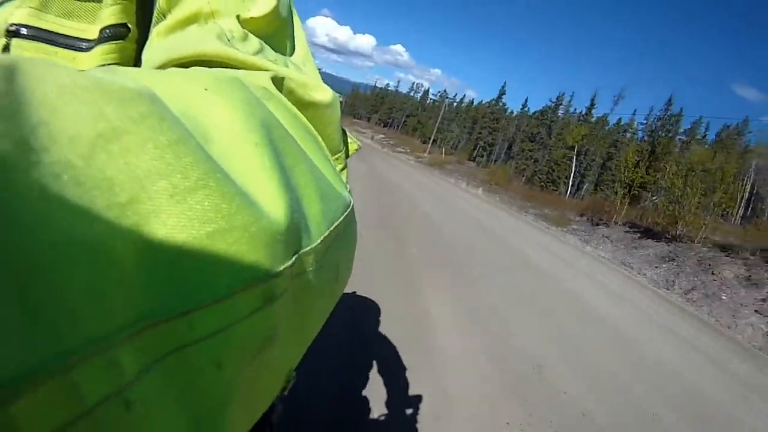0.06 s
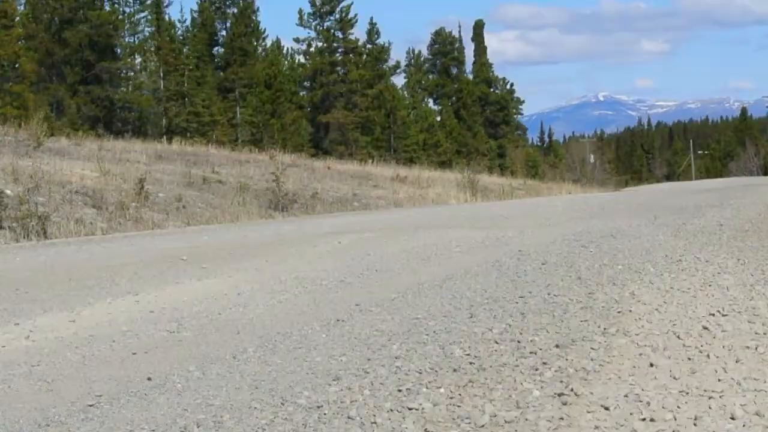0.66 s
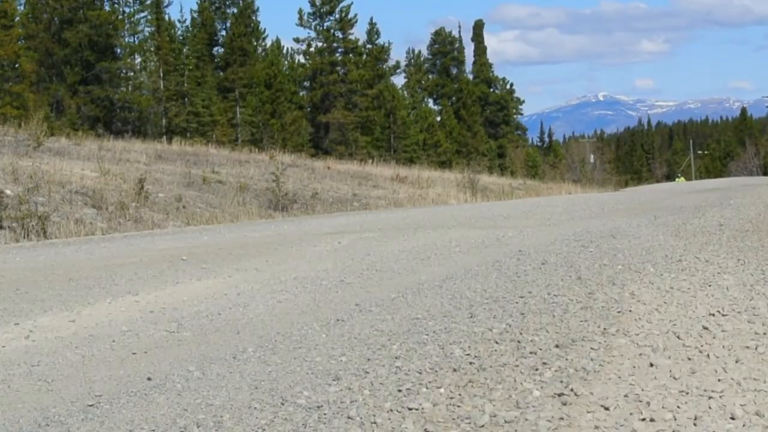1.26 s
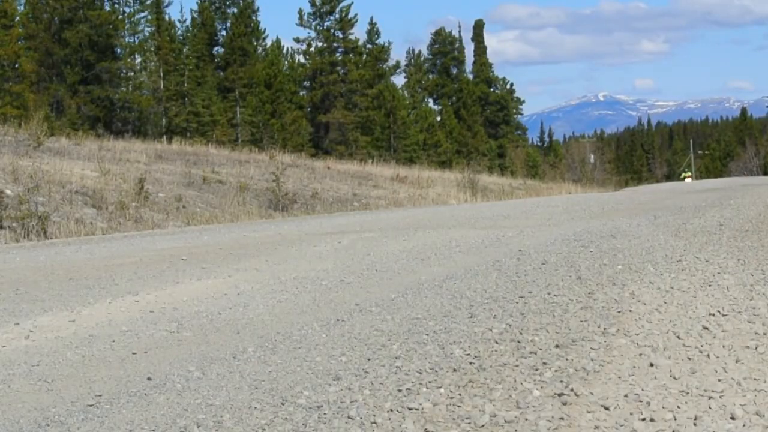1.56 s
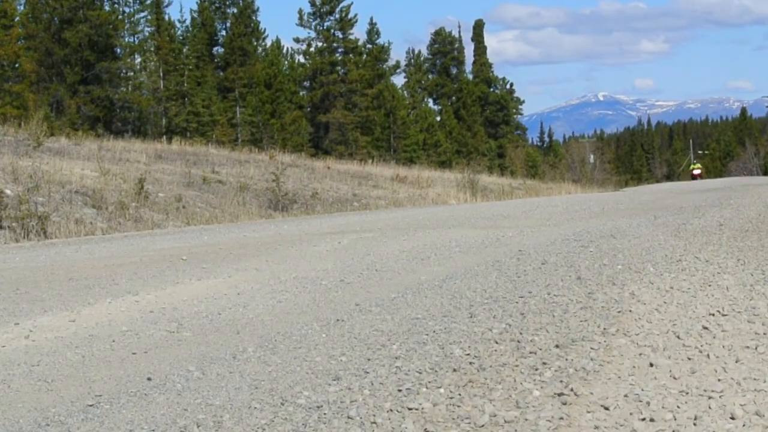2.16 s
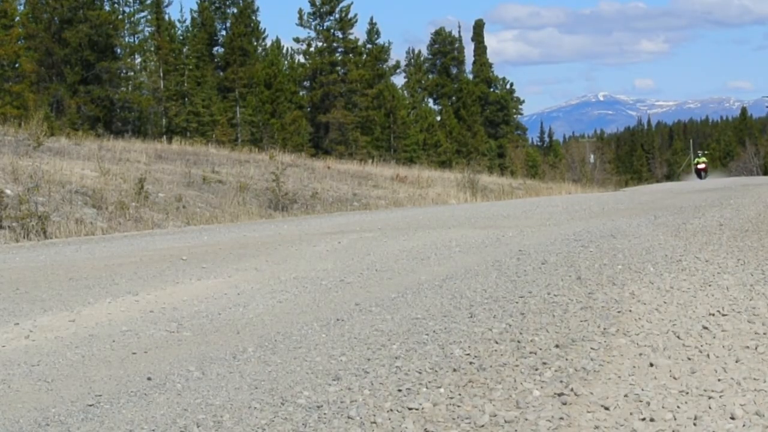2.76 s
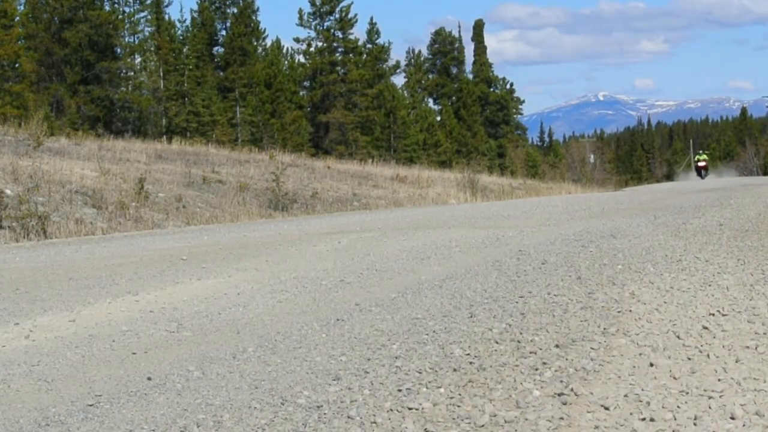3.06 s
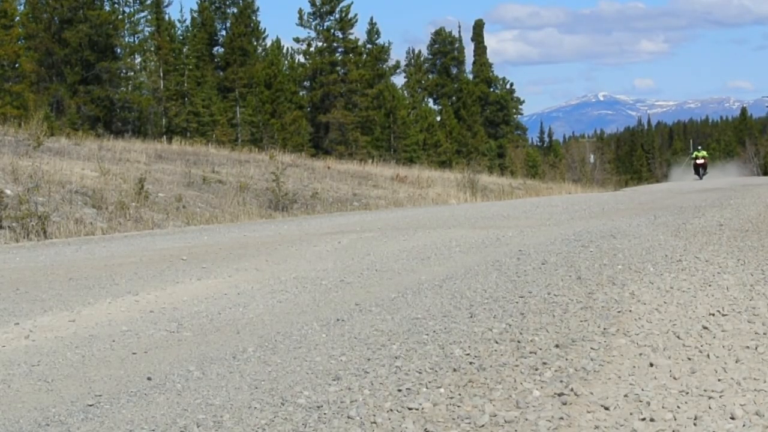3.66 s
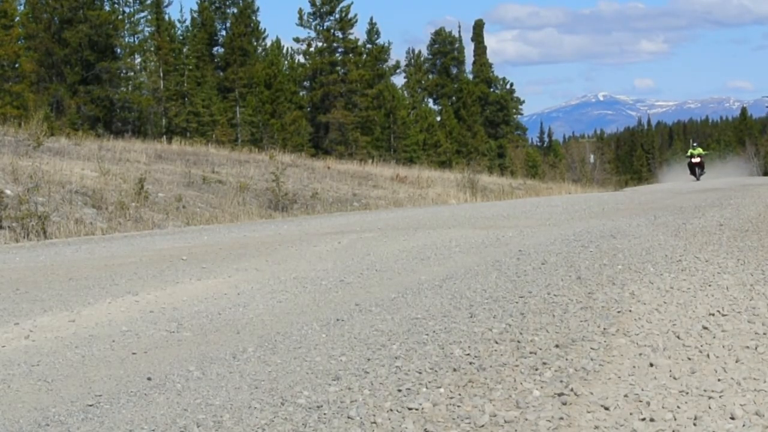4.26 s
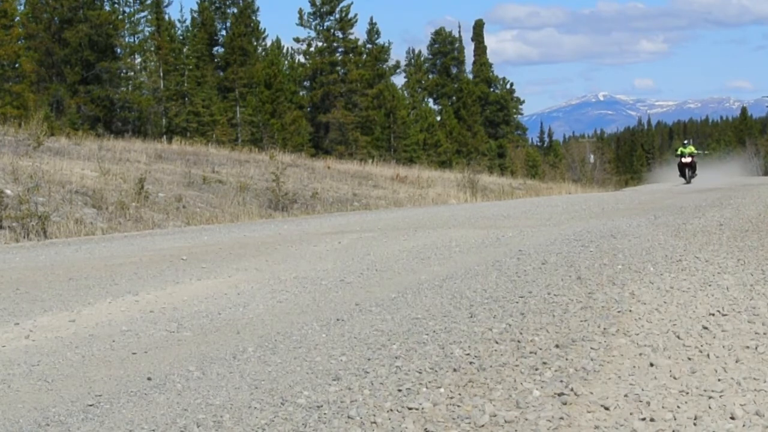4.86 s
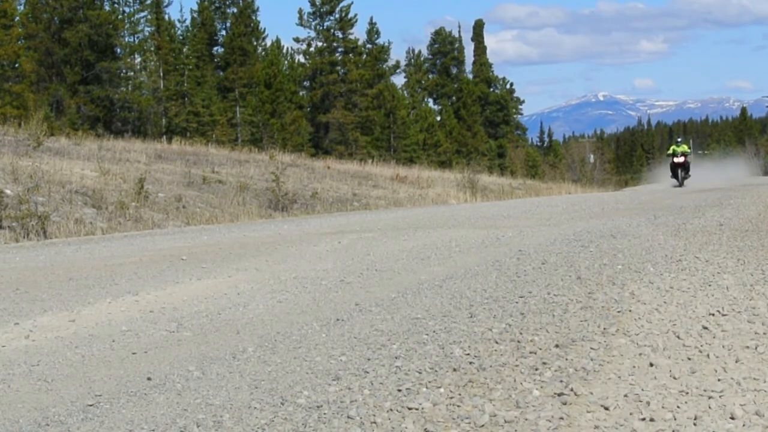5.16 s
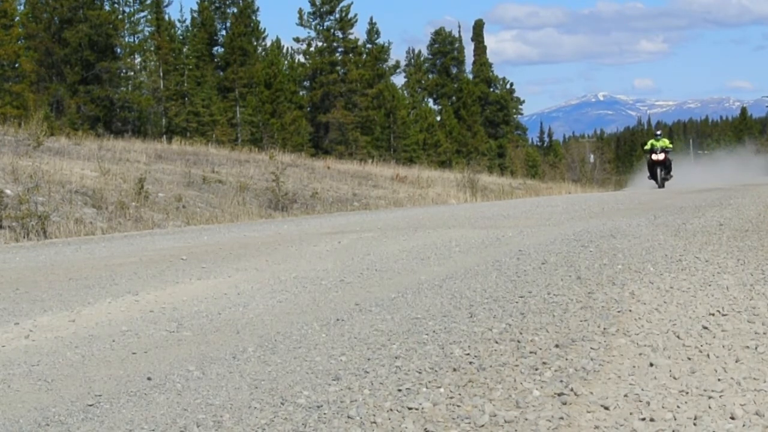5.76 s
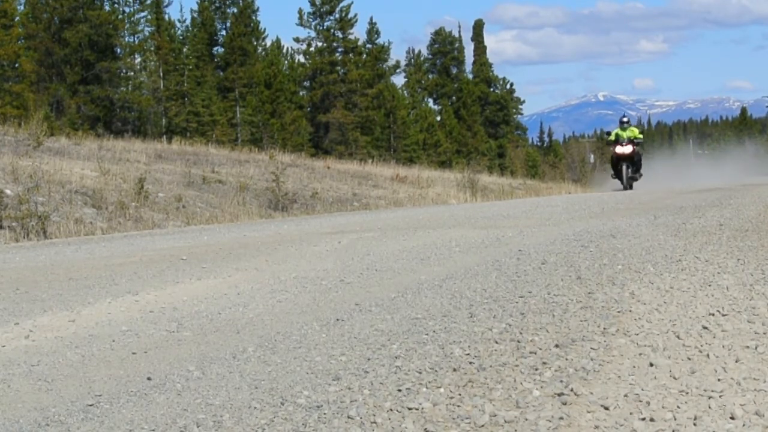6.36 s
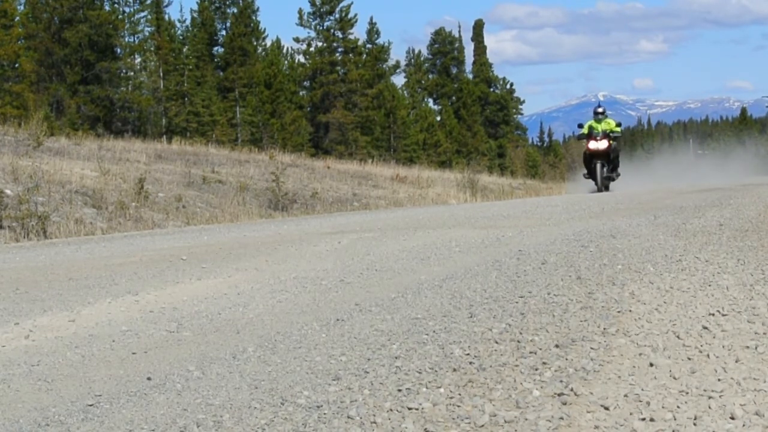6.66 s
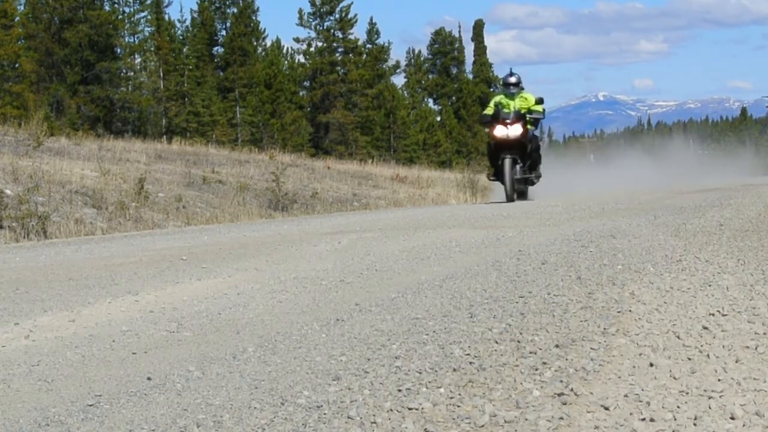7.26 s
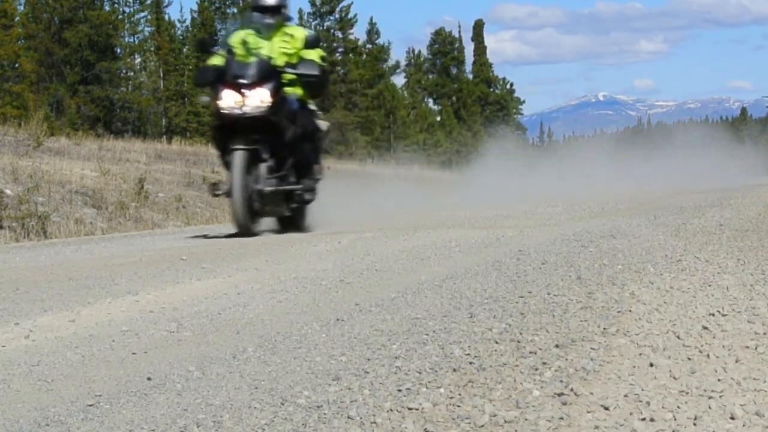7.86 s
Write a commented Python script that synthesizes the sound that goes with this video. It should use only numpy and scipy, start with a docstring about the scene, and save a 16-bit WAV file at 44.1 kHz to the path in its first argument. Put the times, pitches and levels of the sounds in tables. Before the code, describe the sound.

Wind buffets a microphone briefly, then a distant twin-cylinder motorcycle drones steadily closer along a gravel road, its tyres crunching and spraying stones.

```python
"""First, on board a motorcycle: wind buffets the camera's microphone and snaps the rider's jacket.
At 0.655 s we are at the side of a gravel road with a stereo pair, the bike some 140 m off behind a crest.
The exhaust puffs of its twin-cylinder engine drone; it shifts up at 3 s, and single overtones howl out
as it comes closer. The tyres roar and crunch, and from about 7 s they spray loose gravel close by."""
import sys
import numpy as np
from scipy import signal
from scipy.fft import rfft, irfft, next_fast_len
from scipy.io import wavfile

SR = 44100
rng = np.random.default_rng(int(sys.argv[2]) if len(sys.argv) > 2 else 0)


def int16_out(signal):
    """Quantize to a 16-bit WAV file."""
    q = np.round(np.clip(np.atleast_2d(signal).T, -1, 1) * 32767)
    wavfile.write(sys.argv[1], SR, q.astype(np.int16))


N = 349272

# the rider's hand: (time [s], throttle opening [0-1])
THROTTLE = [(.7, 0.54), (1, 1), (1.7, 0.9), (1.9, 0.24), (2.15, 0.4), (2.4, 0.86), (2.9, 1), (3.1, 0.68),
            (3.7, 0.7), (4.7, 0.9), (5.15, 0.96), (5.85, 0.13), (6.2, 0.24), (6.42, 0.85), (7.25, 1),
            (7.5, 0.15), (7.75, 0.6)]
# throttle snapped shut, for gear changes and once close by: (start [s], end [s], speed sag [cycles/s])
THROTTLE_SHUTS = [(1.78, 1.875, 4.37), (2.025, 2.175, 4.32), (2.974, 3.06, 0.98), (7.494, 7.669, .9)]
# tyre roar heard close by: (frequency [Hz], relative density [dB])
NEAR_ROAR_SPECTRUM = [(220, -24), (340, -7.5), (500, -3), (750, 2), (980, .5), (1300, -8), (1460, -6.5),
                      (1600, -17), (1900, -12.5), (2300, -21.5), (5000, -50)]
# distant sound across the roadside pair: (frequency [Hz], left-right likeness [0-1])
DISTANT_LIKENESS = [(100, .998), (500, .99), (1000, .96), (2000, .65), (4000, .3), (8000, .15), (13000, .1)]


def engine(turns, drone_db=-0.2, bark_db=-27, rasp_db=-25):
    """Exhaust drone, a bark of rough upper orders and the rasp of each gas puff, with the lesser voices."""
    # upper exhaust orders: (order [multiple of the cycle rate], relative level [dB])
    upper_orders = [(7, -9.5), (8, -6.5), (9, -11.5), (10, -16), (11, -9.5), (14, -16.5), (16, -15),
                    (17, -28), (18, -17.5), (21, -18), (22, -22), (23, -25), (25, -18)]
    # rushing exhaust gas: (frequency [Hz], relative density [dB])
    rasp_spectrum = [(25, -36), (55, -20), (90, -16), (150, -3.5), (220, -2.5), (340, 1), (520, 1.5),
                     (700, -5), (1100, -13.5), (2500, -38)]
    load = in_time(THROTTLE)[0] * (1 - overrun())
    effort_db = -7 * (1 - load) + overrun() - crest_shadow_db()
    closeness = np.clip(1.5 - distance() / 32, 0, 1)   # beyond 48 m the beats even out
    drone = carried(drone_db) * exhaust_drone(turns) * uneven_firings(turns, spread_db=3 * closeness)
    lows = drone + exhaust_chuff(turns)
    bark = carried(bark_db + effort_db) * overtones(turns, upper_orders, fade_db=3.5, rough=0.4)
    whine = gear_whine(turns, load)
    rasp_gain = carried(rasp_db + effort_db - .5 * crest_shadow_db())
    rasp = rasp_gain * colour(white(), rasp_spectrum) * firing(turns, depth=0.43)
    highs = bark + engine_howl(turns) + whine + rasp + growl(turns)
    return pan(lows, right_db=2) + pan(highs, right_db=2.5)


def exhaust_drone(turns, waver_db=1.56, wander_rad=.1):
    """Clean low orders; the higher lag, so each beat sweeps upward, and far off the beats merge to a hum."""
    # (order [multiple of the cycle rate], loss at zero throttle [dB], change on overrun [dB])
    low_orders = [(2, 9, -1), (3, 11.5, 3), (4, 2, -12), (5, 13, -6), (6, 3.5, -5)]
    # silencer resonances that the orders slide through: (frequency [Hz], level at full throttle [dB])
    silencer = [(82, -35), (92, -38), (123, -27), (141, -28), (165, -34), (180, -28.5), (192, -27),
                (207, -31), (232, -28.5), (255, -36), (278, -29)]
    # single orders swell and fade: (time [s], half length [s], order [multiple], change [dB])
    order_swells = [(0.78, .2, 3, -4.5), (0.79, 0.11, 4, 1), (2.77, 0.16, 3, -8), (2.817, 0.1, 5, 6),
                    (2.85, 0.08, 6, 1), (3.015, 0.03, 3, 2.5), (3.0, .04, 4, -4), (2.97, .06, 5, -3),
                    (2.8, .022, 4, 3), (2.6, 0.4, 4, 2.5), (2.46, 0.22, 5, 4), (4.8, 0.35, 5, 3),
                    (3.3, 0.28, 3, -0.5), (3.6, 0.48, 6, -5), (4.7, 0.37, 6, 2.5), (1.93, 0.042, 4, 2.5),
                    (2.2, 0.043, 4, 3.5), (5.88, 0.12, 3, -5), (5.88, 0.13, 4, 3), (6.1, 0.46, 6, 3.5),
                    (5.6, .15, 4, 3), (7.103, 0.053, 3, -1), (7.4, .12, 4, -1.5), (7.818, 0.18, 3, 3),
                    (7.72, .08, 4, -4)]
    rate, shut = cycle_rate(), overrun()
    eased = 1 - in_time(THROTTLE)[0]
    dispersion = np.interp(distance(), [106, 120], [0.0833, 0.122])
    out = 0
    for order, loss_db, overrun_db in low_orders:
        hz = order * rate
        hidden = np.interp(hz, [150, 520], [0, 1])   # the bass bends over the crest
        level_db = np.interp(hz, *np.transpose(silencer)) - loss_db * eased + overrun_db * shut
        level_db -= hidden * crest_shadow_db()
        level_db += sum(db * swell(s, half_s) for s, half_s, k, db in order_swells if k == order)
        phase = 2 * np.pi * (order * turns - dispersion * order ** 2) + wander_rad * drift(3.9)
        out += from_db(level_db + waver_db * drift(2.2)) * np.sqrt(2) * np.cos(phase)
    return out


def exhaust_chuff(turns, level_db=-24, shut_loss_db=5):
    """Close to the microphones, each puff leaves the silencer as a coarse low blast of gas."""
    # the blast: (frequency [Hz], relative density [dB])
    spectrum = [(45, -20), (70, -7), (130, -5), (220, -5), (380, 2.5), (520, -1.5), (750, -21), (1500, -37)]
    gain = carried(level_db - shut_loss_db * overrun(), ground_db_per_m=0.23)
    return gain * colour(white(), spectrum) * firing(turns, depth=2)


def engine_howl(turns):
    """Single engine overtones howl out at set moments, each for a while."""
    # (time [s], half length [s], order [multiple of the cycle rate], level at 10 m [dB])
    howls = [(1.35, .12, 11, -37), (2.65, .2, 15, -35), (2.642, .25, 23, -42), (2.7, .25, 24, -47),
             (3.5, 0.43, 15, -34.5), (3.55, 0.54, 9, -32.5), (3.92, 0.09, 7, -35.5), (3.5, 0.2, 12, -40),
             (4.6, 0.49, 9, -39), (4.251, 0.59, 12, -30), (4.553, .4, 15, -33.5), (4.956, 0.23, 12, -35),
             (5.057, 0.2, 15, -34), (5.086, 0.099, 8, -27), (5.46, .16, 12, -29), (5.47, 0.2, 15, -28.5),
             (5.872, 0.3, 12, -32), (6.05, 0.36, 22, -39), (6.52, 0.21, 15, -30), (6.85, .15, 16, -30),
             (6.947, 0.4, 12, -33), (7.252, 0.19, 15, -29)]
    out = 0
    for order in sorted({row[2] for row in howls}):
        gain = sum(from_db(db) * swell(s, half_s) for s, half_s, k, db in howls if k == order)
        out += gain * overtones(turns, [(order, 0)], fade_db=1.74, rough=.5)
    return carried(0) * out


def growl(turns):
    """The firings shake a hollow resonance that wanders in pitch; a higher one rings while coasting."""
    # the hollow resonance: (time [s], centre [Hz], level at 10 m [dB])
    resonance = [(1.2, 694, -55), (2, 711.5, -39), (2.7, 699, -34.5), (3.3, 700, -35), (3.65, 695, -41),
                 (3.78, 700, -29), (3.95, 701.3, -53), (5.1, 693, -39), (5.6, 770, -30.5),
                 (5.9, 786, -28.5), (6.15, 766.4, -31), (6.45, 717.5, -26), (7.2, 713.8, -26),
                 (7.62, 739.5, -36), (7.85, 815, -30.5)]
    # the higher ring: (time [s], half length [s], level at 10 m [dB])
    coast_rings = [(5.95, 0.27, -40), (7.597, 0.15, -30)]
    centre_hz, level_db = in_time(resonance)
    hollow = carried(level_db) * ringing(centre_hz, width_hz=56)
    coast_gain = sum(carried(db) * swell(s, half_s) for s, half_s, db in coast_rings)
    coasting = coast_gain * ringing(centre_hz=980, width_hz=28)
    return (hollow + coasting) * firing(turns, depth=0.44)


def gear_whine(turns, load, order=10.22, level_db=-36):
    """The gears whine thinly under load while the bike is still far away."""
    gain = carried(level_db + 1.1 * drift(6)) * load * during(0.93, 2.52, ramp_s=0.11)
    return gain * np.sqrt(2) * np.cos(2 * np.pi * order * turns + 0.33 * drift(10))


def overtones(turns, orders, fade_db, rough):
    """Upper orders fade in and out over the changing ground path and shake with uneven firings."""
    out = 0
    for order, level_db in orders:
        phase = 2 * np.pi * (order * turns + rng.random()) + rough * drift(7.9)
        out += from_db(level_db + fade_db * drift(5.7)) * np.sqrt(2) * np.cos(phase)
    return out


def firing(turns, depth):
    """The two cylinders give two unevenly spaced puffs in every cycle; rms 1."""
    puffs = sum(np.exp(4 * (np.cos(2 * np.pi * (turns - late)) - 1)) for late in (0, 3 / 8))
    return rms_one(1 + depth * puffs)


def uneven_firings(turns, spread_db):
    """Every cycle burns with a strength of its own."""
    cycles = np.arange(int(turns[-1]) + 2)
    strengths = rng.standard_normal(N)[:len(cycles)]
    return from_db(spread_db * np.interp(turns, cycles, strengths))


def cycle_rate(sag_s=0.071, overshoot=0.4187, blip_s=0.05002):
    """Engine cycles per second; they sag when the throttle snaps shut and blip as it reopens."""
    # engine speed in gear, with an upshift at 3 s: (time [s], four-stroke rate [cycles/s])
    engine_speed = [(.7, 43.7), (1.7, 46), (2.35, 45.5), (2.9, 48.5), (3.1, 40.8), (3.69, 41.4),
                    (4.9, 46.1), (5.32, 45.7), (5.91, 44.1), (6.23, 44.2), (7.07, 47.4), (7.4, 46.1),
                    (7.92, 43.3)]
    rate = in_time(engine_speed)[0]
    for start, end, sag in THROTTLE_SHUTS:
        rate += sag * (overshoot * swell(end + blip_s, blip_s) - during(start, end, sag_s))
    return rate


def overrun():
    """1 while the throttle is snapped shut, else 0."""
    return sum(during(start, end, ramp_s=0.036) for start, end, _ in THROTTLE_SHUTS)


def tyre_roar(turns):
    """The broad roar of the rolling tyres, throbbing faintly with the firings."""
    # the roar over changing ground: (time [s], level at 10 m [dB])
    levels = [(.8, -39.5), (1.55, -33), (2.15, -33.5), (2.7, -29.5), (3.1, -32.5), (3.65, -31), (3.87, -30),
              (4.5, -30.5), (5.8, -27), (6.9, -25.5), (7.13, -20.5), (7.53, -23), (7.7, -21.5), (7.92, -27)]
    # the roar from far up the road: (frequency [Hz], relative density [dB])
    far_spectrum = [(250, -36), (500, -3), (600, -0.5), (710, 3.5), (860, -1.5), (1000, -1.2), (1200, -6),
                    (1430, -8), (1700, -20), (2400, -18), (5000, -51)]
    gain = carried(in_time(levels)[0] + 0.31 * drift(11))
    roar = nearing(white(), far_spectrum, NEAR_ROAR_SPECTRUM, DISTANT_LIKENESS)
    return gain * firing(turns, depth=0.043) * roar


def stone_knocks():
    """Close by, big stones knock under the tyres: short dull bursts with the colour of the roar."""
    # (time [s], peak level [dB])
    knocks = [(7.108, -20.5), (7.138, -22), (7.238, -20), (7.357, -24), (7.539, -26), (7.577, -20),
              (7.598, -22), (7.691, -26), (7.767, -22), (7.789, -17), (7.843, -20)]
    return bursts(knocks, decay_s=0.0081) * colour(white(), NEAR_ROAR_SPECTRUM)


def gravel(crunch_db=-30.5, rolling_loss_db=8, grit_db=-47, pebble_db=-48, grip_s=0.17):
    """Stones crunch under the tyres, less when the rear wheel only rolls; coarse patches hiss and rattle."""
    # crunching stones: (frequency [Hz], relative density [dB])
    crunch_spectrum = [(700, -5.5), (1400, -1.5), (2000, -1), (2700, -2.5), (3700, -3.5), (5000, -7.5),
                       (7500, -12), (12000, -23.5)]
    # hissing grit: (frequency [Hz], relative density [dB])
    grit_spectrum = [(2300, -25), (3200, -3.5), (3650, -2), (4200, -3), (5500, -19)]
    # coarse patches in the road: (time [s], half length [s], rise [dB])
    patches = [(3.8, 0.65, 3), (5.4, 0.28, 9), (7.327, 0.21, 14.5)]
    follow = 1 / (grip_s * SR)   # the tyre digs in a moment after the throttle opens
    rolling = signal.lfilter([follow], [1, follow - 1], (1 - in_time(THROTTLE)[0]) ** 2)
    level_db = crunch_db - rolling_loss_db * rolling - 0.33 * crest_shadow_db() + .5 * drift(30)
    patch_db = sum(db * swell(s, half_s) for s, half_s, db in patches)
    crunch = from_db(level_db) * colour(impacts(per_s=8000, spread_db=2), crunch_spectrum)
    grit = from_db(grit_db + patch_db) * colour(impacts(per_s=6100, spread_db=2.5), grit_spectrum)
    rattle = from_db(pebble_db + patch_db) * pebbles()
    return carried(0, ground_db_per_m=0.04) * (crunch + grit + rattle)


def pebbles(ring_s=.0016):
    """Small stones clack together, each ringing briefly at one of several pitches; rms 1."""
    # pebble resonances: (frequency [Hz], relative level [dB])
    modes = [(2900, -6), (3300, 0), (3520, 0), (3750, 2), (4050, -3.5), (4600, 2), (5400, -9), (6300, -8)]
    hits = impacts(per_s=260, spread_db=1)
    mode_of_hit = rng.integers(0, len(modes), N)
    r = np.exp(-1 / (ring_s * SR))
    out = 0
    for k, (hz, level_db) in enumerate(modes):
        poles = [1, -2 * r * np.cos(2 * np.pi * hz / SR), r * r]
        strikes = hits * (mode_of_hit == k) + 1e-18 * (mode_of_hit == 0)
        out += from_db(level_db) * signal.lfilter([1, 0, -1], poles, strikes)
    return rms_one(out + out[::-1] / 2)   # each clack reaches both microphones


def flying_stones(spray_db=-44, loose_from_s=6.83, loose_ramp_s=0.35, loose_rise_db=18.5):
    """The tyres fling a bright spray that leaps up where the gravel lies loose, near the microphones."""
    # the spray from far off: (frequency [Hz], relative density [dB])
    far_spectrum = [(2000, -22), (4000, 0.5), (6500, 2), (8500, 0), (11500, 0.5), (12100, -11),
                    (14000, -28), (15600, -38)]
    # the spray close by: (frequency [Hz], relative density [dB])
    near_spectrum = [(2000, -4.5), (4000, -7), (6500, -3), (8500, -2.5), (11200, 0), (12400, -3.5),
                     (14000, -6.5), (15600, -15)]
    # the spray across the pair: (frequency [Hz], left-right likeness [0-1])
    likeness = [(2000, 1), (5000, 0.76), (10000, 0.81), (14000, 0.31)]
    loose = np.clip((np.arange(N) / SR - loose_from_s) / loose_ramp_s, 0, 1)
    gain = carried(spray_db + loose_rise_db * loose + 0.53 * drift(25), ground_db_per_m=0.15)
    return gain * nearing(impacts(per_s=12000, spread_db=2), far_spectrum, near_spectrum, likeness)


def wind(rumble_db=-18.5, rush_db=-39.5, crackle_db=-56):
    """Turbulence on the on-board microphone gives lumpy pressure and a tearing rush; cloth flicks in it."""
    # an abrupt click at the start, a brief duck after the hardest buffet (0.326 s), else gusts and lulls:
    # (time [s], half length [s], rumble change [dB], rush change [dB])
    level_changes = [(.002, 0.01, 7.5, 15.5), (0.047, .012, -4.5, 0), (0.215, 0.095, 3.5, 5),
                     (0.3, 0.0093, 0.5, 8), (0.326, 0.011, -14, -6), (0.429, 0.0092, -5, 7),
                     (0.61, 0.0035, -3, -5), (.635, 0.049, 2, 6)]
    # pressure on the microphone: (frequency [Hz], relative density [dB])
    rumble_spectrum = [(15, -3.5), (28, -29), (45, -4), (120, -4), (200, -11), (300, -15.5), (450, -21.5),
                       (700, -42), (1500, -48), (4000, -87)]
    # air tearing past it: (frequency [Hz], relative density [dB])
    rush_spectrum = [(300, 3), (700, 5.5), (1200, -3.5), (2000, -9.5), (3500, -20.5), (5200, -27),
                     (7000, -29), (10000, -25), (11300, -20), (12100, -22), (13000, -23), (15500, -32)]
    rumble_change_db = sum(db * swell(s, half_s) for s, half_s, db, _ in level_changes)
    rush_change_db = sum(db * swell(s, half_s) for s, half_s, _, db in level_changes)
    dips = buffets()
    rumble = from_db(rumble_db + rumble_change_db) * mono_noise(rumble_spectrum)
    pressure = rumble * (1 - np.clip(np.abs(dips), 0, 1)) + dips
    rush = from_db(rush_db + rush_change_db + 3 * drift(79)) * mono_noise(rush_spectrum)
    cloth_flicks = signal.lfilter([1], [1, -.8], impacts(per_s=300, spread_db=4.5)[0])
    crackle = from_db(crackle_db + rush_change_db) * rms_one(cloth_flicks)
    return pressure + rush + crackle + recorder_whistle(pressure)


def buffets():
    """Eddies slap the on-board microphone, each a dip of suction between two rims of pressure."""
    # (time [s], suction level [dB], half width [ms])
    eddies = [(0.025, -6.5, 2.15), (0.084, -6, 1.8), (0.212, -7.5, 0.95), (0.3095, 1.5, 1.46),
              (0.4395, -5, 1.14), (0.48, -8, 4.6), (.619, -4, 1.1), (.640, -5.5, 1.03)]
    dips = np.zeros(N)
    for s, level_db, width_ms in eddies:
        u = np.clip((np.arange(N) / SR - s) / (width_ms / 1000), -9, 9)
        dips -= from_db(level_db) * (1 - u ** 2 / 2) * np.exp(-u ** 2 / 2)
    return dips


def jacket_snaps(boost_db=3):
    """The rider's jacket snaps in the airstream."""
    # (time [s], relative peak level [dB])
    snaps = [(.0256, -35), (.0845, -43), (.1455, -45), (.1705, -47), (.1895, -42), (.1977, -37),
             (.2472, -35), (.2925, -40), (.3098, -32), (.404, -49), (.437, -52), (.486, -46), (.5158, -48),
             (.527, -40), (.619, -37), (.627, -34), (.6312, -37), (.636, -37), (.640, -35)]
    # snapping cloth: (frequency [Hz], relative density [dB])
    spectrum = [(500, -6), (1500, 7), (4500, 2), (7500, -2), (12000, -10), (15000, -14)]
    return from_db(boost_db) * bursts(snaps, decay_s=0.001) * mono_noise(spectrum)


def recorder_whistle(pressure, level_db=-50.5, hz=12050):
    """A thin whistle follows the rumble: the recorder mirrors the bass around 12 kHz."""
    swings = rms_one(np.gradient(pressure))
    return from_db(level_db) * swings * np.cos(2 * np.pi * hz * np.arange(N) / SR)


def still_air(level_db=-52):
    """The quiet floor at the roadside: still air and microphone hiss."""
    # (frequency [Hz], relative density [dB])
    spectrum = [(25, 1), (100, 16), (280, 22), (450, 7), (700, -11), (1500, 3.5), (3000, 0), (6000, 3),
                (11000, 3), (15600, 0.5)]
    return from_db(level_db) * colour(white(), spectrum)


def distance(speed_m_per_s=18.63, pass_s=8.02, miss_m=7.97):
    """Metres from the roadside microphones to the bike, which rides a straight line."""
    return np.hypot(speed_m_per_s * (pass_s - np.arange(N) / SR), miss_m)


def carried(level_db, ground_db_per_m=0, reference_m=10):
    """Gain of a source on the bike: it falls with distance, and the ground may soak up more."""
    metres = distance()
    return from_db(level_db - ground_db_per_m * metres) * reference_m / metres


def crest_shadow_db(crest_m=84, db_per_m=0.14):
    """Beyond a crest, the road hides the bike more with every metre."""
    return db_per_m * np.maximum(distance() - crest_m, 0)


def nearing(pair, far_spectrum, near_spectrum, likeness, near_m=8.4, far_m=15):
    """A noise whose colour opens as the bike draws level with the microphones."""
    near = np.interp(distance(), [near_m, far_m], [1, 0.23])
    far_sound = colour(pair, far_spectrum, likeness)
    near_sound = colour(pair, near_spectrum, likeness)
    return (1 - near) * far_sound + near * near_sound


def from_the_right(x, lag_samples=2, low_cut_hz=36):
    """The left microphone hears the bike later; the right one's low cut makes the bass lead there."""
    low_cut = signal.butter(1, low_cut_hz, "high", fs=SR, output="sos")
    return np.array([np.roll(x[0], lag_samples), signal.sosfilt(low_cut, x[1])])


def deaf_band(x, notch_hz=6000, width_hz=560):
    """The on-board microphone is deaf in one narrow band: two like notches in series."""
    b, a = signal.iirnotch(notch_hz, notch_hz / width_hz, fs=SR)
    return signal.lfilter(b, a, signal.lfilter(b, a, x))


def pan(x, right_db):
    """Lean a sound to the right."""
    return x * from_db([[-right_db / 2], [right_db / 2]])


def white():
    """Two unrelated white noises."""
    return rng.standard_normal((2, N))


def impacts(per_s, spread_db):
    """Two trains of random impacts, a few much harder than the rest; rms 1."""
    luck, hits = rng.random((2, N)), np.zeros((2, N))
    hardness = np.minimum(rng.exponential(1, (2, N)), 5)
    struck = np.abs(luck - .5) < per_s / SR / 2
    hits[struck] = np.sign(luck[struck] - .5) * from_db(spread_db * hardness[struck])
    return rms_one(hits)


def colour(pair, spectrum, likeness=DISTANT_LIKENESS):
    """Two unrelated signals become one stereo sound of this spectrum and likeness; rms 1."""
    size = next_fast_len(N, True)
    mid, side = rfft(pair, size) * from_db(at_hz(spectrum))
    alike = np.clip(at_hz(likeness), 0, 1)
    left_right = np.sqrt(1 + alike) * mid + np.sqrt(1 - alike) * side * [[1], [-1]]
    return rms_one(irfft(left_right, size)[:, :N])


def mono_noise(spectrum):
    """Noise of this spectrum on a single microphone; rms 1."""
    size = next_fast_len(N, True)
    bins = rfft(rng.standard_normal(size)) * from_db(at_hz(spectrum))
    return rms_one(irfft(bins, size)[:N])


def ringing(centre_hz, width_hz):
    """Noise in one narrow resonance, whose centre may move; rms 1."""
    phase = 2 * np.pi * np.cumsum(centre_hz * np.ones(N)) / SR
    return drift(width_hz) * np.cos(phase) + drift(width_hz) * np.sin(phase)


def drift(rate_hz, step=40, settle=2000):
    """A slow random wander of spread 1."""
    r = np.exp(-2 * np.pi * step * rate_hz / SR)
    noise = rng.standard_normal(N // step + settle + 2)
    slow = rms_one(signal.lfilter([1], [1, -2 * r, r * r], noise)[settle:])
    return np.interp(np.arange(N) / step, np.arange(len(slow)), slow)


def bursts(rows, decay_s):
    """An envelope that jumps at each (time [s], peak level [dB]) and dies away."""
    s, level_db = np.transpose(rows)
    hits = np.zeros(N)
    hits[(s * SR).astype(int)] = from_db(level_db)
    return signal.lfilter([1], [1, -np.exp(-1 / (decay_s * SR))], hits + 1e-18)


def swell(s, half_s):
    """A smooth bump of height 1 around a moment."""
    u = (np.arange(N) / SR - s) / half_s
    return np.exp(-np.minimum(u ** 2, 50))


def during(start, end, ramp_s):
    """1 between two moments, 0 outside, with ramped edges."""
    t = np.arange(N) / SR
    return np.clip(np.minimum(t - start, end - t) / ramp_s + .5, 0, 1)


def in_time(rows):
    """A table over time, read at every sample: one curve per value column."""
    s, *columns = np.transpose(rows)
    return [np.interp(np.arange(N) / SR, s, column) for column in columns]


def at_hz(points):
    """A table over frequency, read at every bin."""
    hz, value = np.transpose(points)
    bin_hz = np.fft.rfftfreq(next_fast_len(N, True), 1 / SR)
    return np.interp(np.log(bin_hz + 1), np.log(hz), value)


def from_db(db):
    """Decibels to gain."""
    return np.exp(np.asarray(db) * (np.log(10) / 20))


def rms_one(x):
    """Scale to rms 1."""
    return x / np.sqrt(np.mean(x ** 2) + 1e-20)


def scene(ride_end_s=.655):
    """The on-board microphone gives way abruptly to the roadside pair, with the bike to its right."""
    on_board = deaf_band(wind() + jacket_snaps())
    turns = np.cumsum(cycle_rate()) / SR   # engine cycles completed
    bike = engine(turns)
    bike += pan(tyre_roar(turns) + stone_knocks(), right_db=2.5)
    bike += pan(gravel(), right_db=3.5)
    roadside = from_the_right(bike) + still_air() + pan(flying_stones(), right_db=0.3)
    at_roadside = np.clip((np.arange(N) / SR - ride_end_s) / 0.0026 + .5, 0, 1)
    return (1 - at_roadside) * on_board + at_roadside * roadside


def record(dry, cutoff_hz=15700):
    """Peaks are limited just under full scale, and the top of the treble is cut."""
    low_pass = signal.ellip(10, .1, 90, cutoff_hz, fs=SR, output="sos")
    return signal.sosfilt(low_pass, np.clip(dry, -.97, .97))


dry = scene()
out = record(dry)
int16_out(out)
```